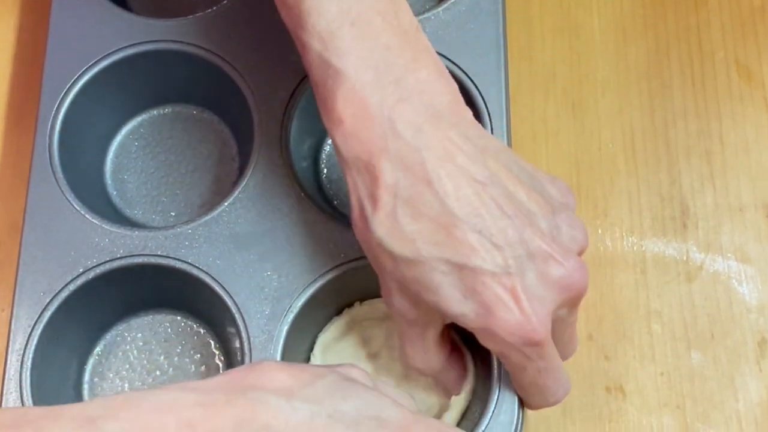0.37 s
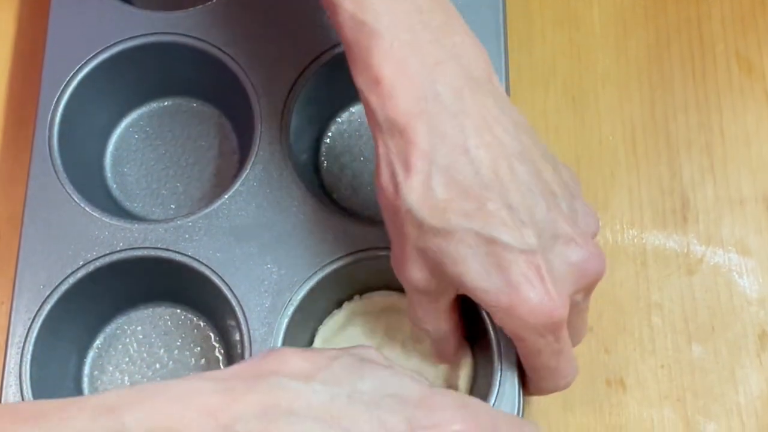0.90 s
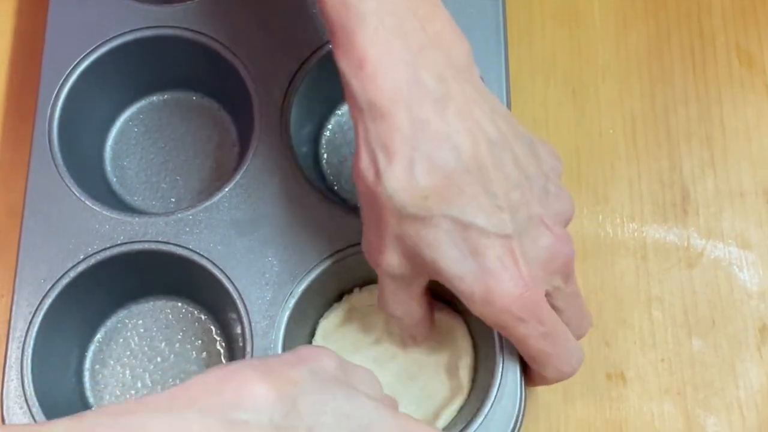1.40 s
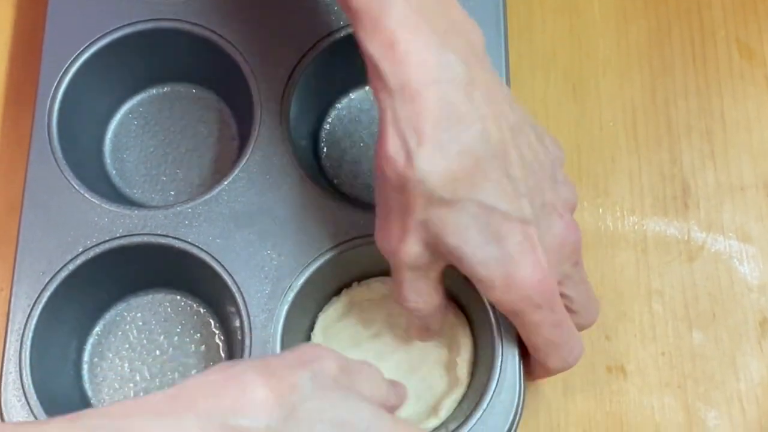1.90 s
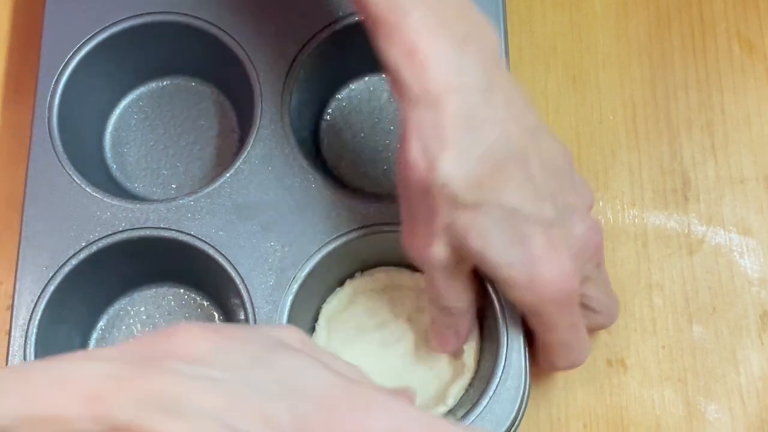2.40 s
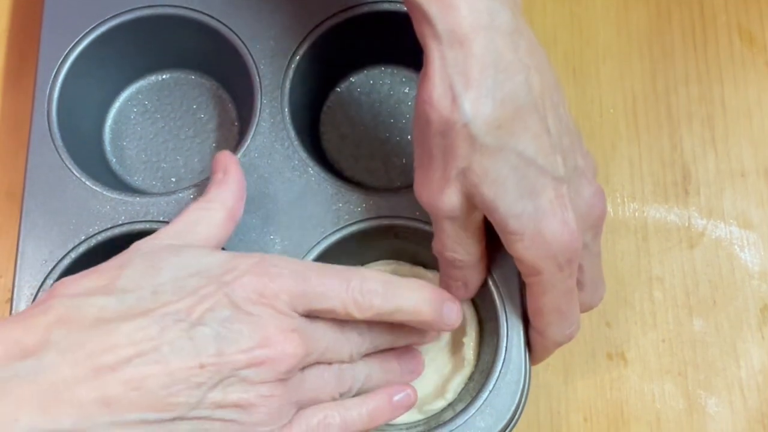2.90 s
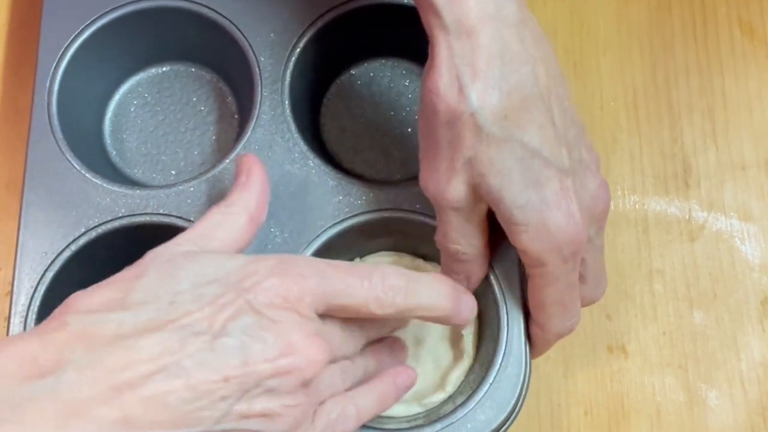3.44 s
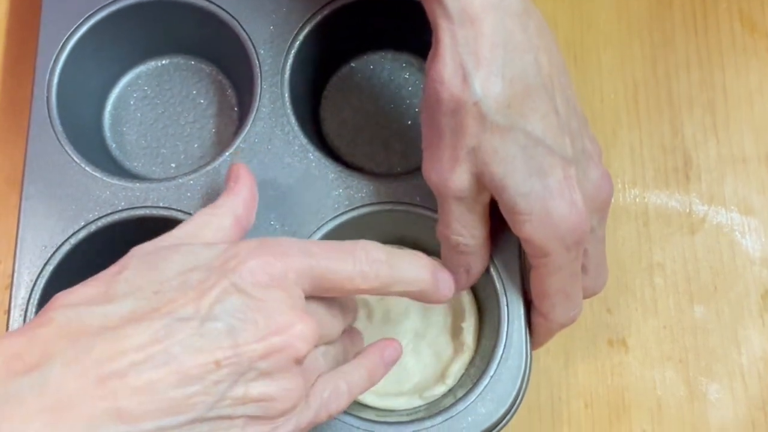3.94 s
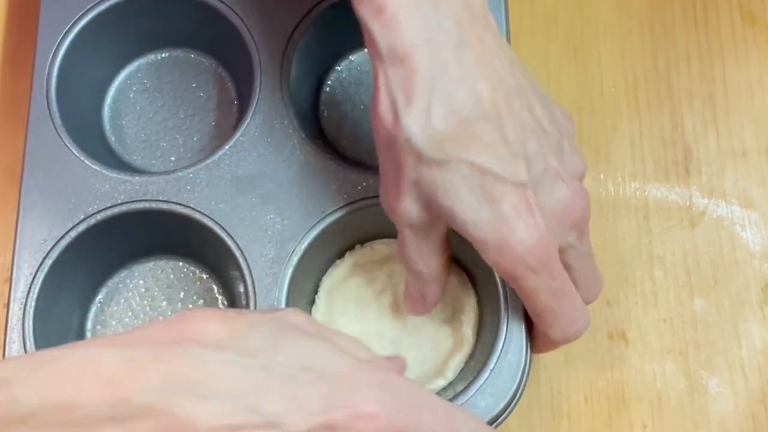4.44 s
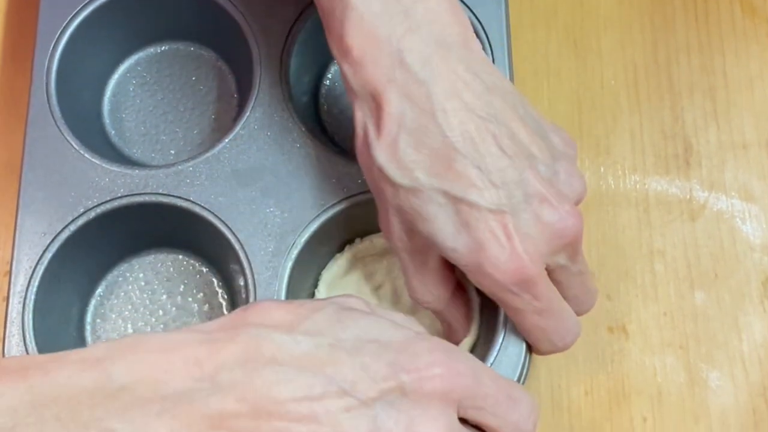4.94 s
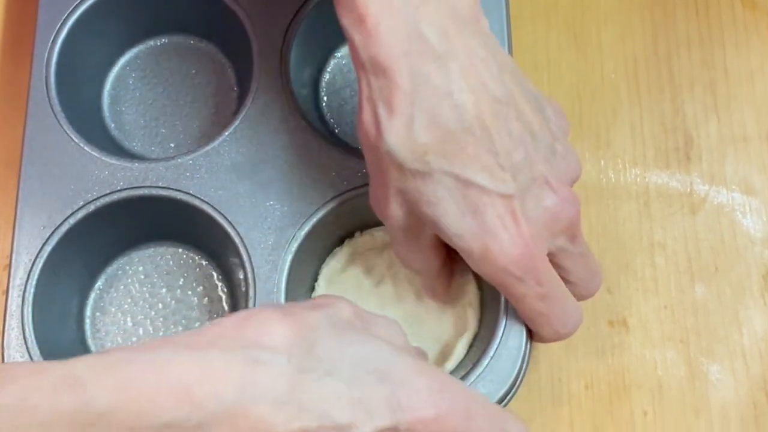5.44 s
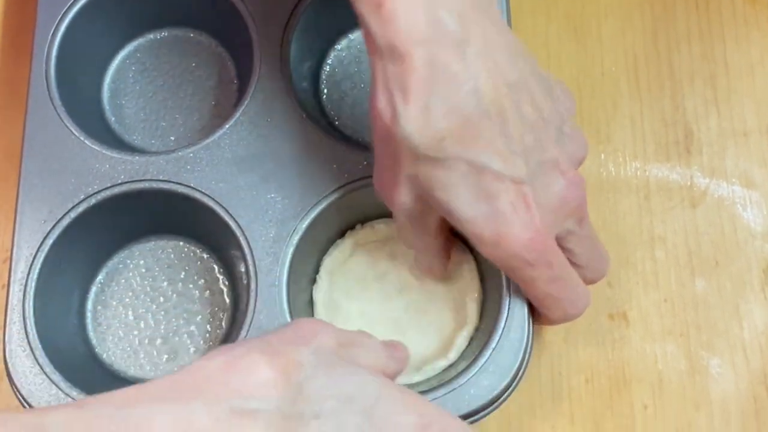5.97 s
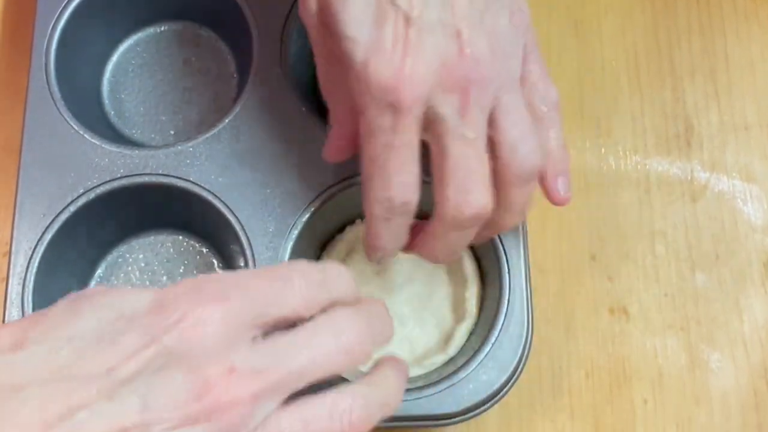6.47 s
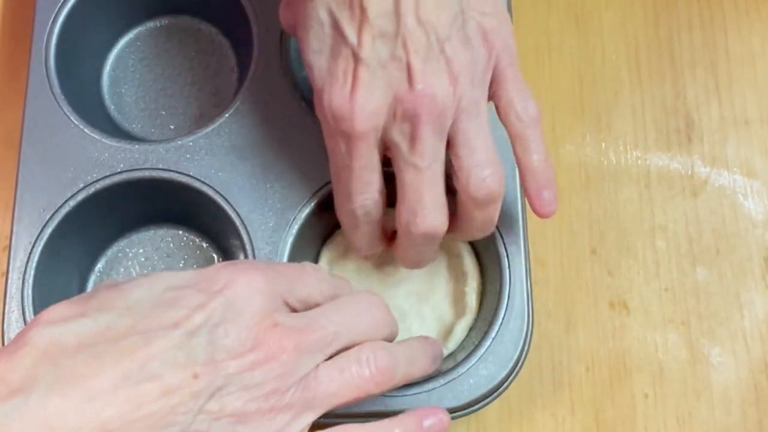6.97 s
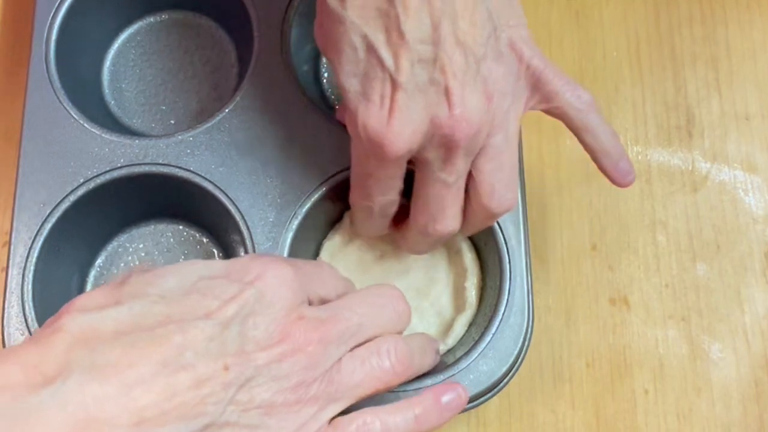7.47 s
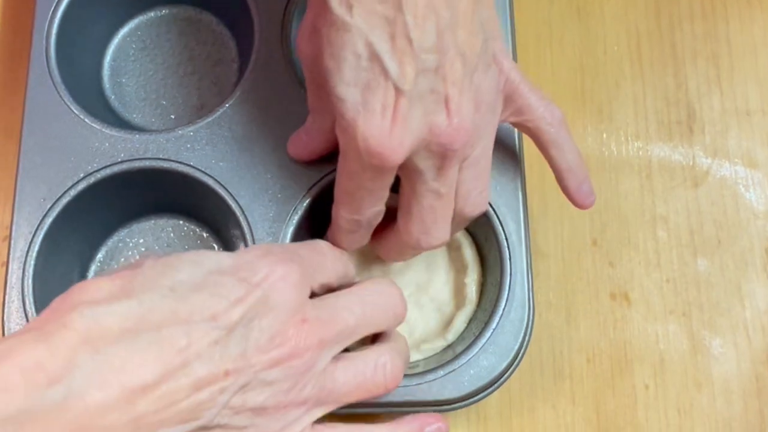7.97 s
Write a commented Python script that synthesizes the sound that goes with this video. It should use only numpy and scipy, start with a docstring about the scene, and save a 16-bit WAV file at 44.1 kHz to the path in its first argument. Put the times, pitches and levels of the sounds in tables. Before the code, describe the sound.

Fingers press and smear soft dough in a metal baking tin, with faint sticky rustles, low rumbles and knocks on a wooden counter.

```python
"""Fingers press soft dough into a cup of a metal baking tin on a wooden counter in a quiet kitchen.
Friction noise of skin on metal sets the tin ringing; smeared greasy dough gives crackling hiss, and ticks as it
lets go. The rocking tin knocks and slides, both as modal ringing, and uneven low noise through the counter's
modes makes a swelling rumble. Two close microphone ports on a stand hear this with reflections, air noise
and a faint whine."""
import sys
import numpy as np
from scipy import signal
from scipy.fft import rfft, irfft, next_fast_len
from scipy.io import wavfile

SR = 44100
rng = np.random.default_rng(int(sys.argv[2]) if len(sys.argv) > 2 else 0)


def waveform_to_disk(signal):
    """Save audio, clipped to [-1, 1], as 16-bit WAV at the path in sys.argv[1]."""
    frames = np.transpose(np.atleast_2d(signal))
    scaled = np.clip(frames, -1, 1) * 32767
    samples = np.round(scaled).astype(np.int16)
    wavfile.write(sys.argv[1], SR, samples)


def level_to_linear(level):
    """Convert decibel levels to linear amplitude factors, elementwise."""
    exponent = np.asarray(level, float) / 20
    return 10 ** exponent


N = 357819  # samples

# Air noise of the room. Each row: frequency in Hz, relative spectral level in dB.
ROOM_SPECTRUM = [(20, 9.5), (35, 7), (55, 2), (120, -2.5), (200, -26), (500, -12), (1400, -17),
                 (2600, -21.5), (5000, -28.5), (9000, -29.5), (14000, -34.5), (14600, -58.5)]
ROOM_DB, WHINE_HZ = -71, 2071.5

# Modes of the counter with the tin on it. Each row: frequency in Hz, level in dB,
# unshortened 60 dB decay time in s.
COUNTER_MODES = [(60.2, 4.5, 0.38), (97.44, -0.5, 0.39), (128.2, 3.5, 0.18), (153.4, -9, 0.23),
                 (213.4, -4, 0.11), (276, -6.5, 0.084), (342.7, -6, 0.06), (390.6, -3, 0.068)]

# Modes of the tin. Each row: frequency in Hz, level in dB, 60 dB decay time in s before the hands damp it.
TIN_MODES = [(398.8, 0.5, 0.084), (447, -4.5, 0.055), (547, -6, 0.17), (647, -3.5, 0.061), (817, -6, 0.15),
             (985, -2, 0.06), (1039, 6, 0.13), (1250, -2.5, 0.13), (1508, -8.5, 0.28), (1843, -6.5, 0.22),
             (2268, -0.5, 0.099), (2677, 2, 0.1), (3013, -7, 0.18), (3827, -5.5, 0.071), (4174, -6, 0.097),
             (4654, 3.5, 0.024), (6124, -12.5, 0.21), (6590, -8.5, 0.13)]

# The tin slides a little on the counter and sings. Each row: start in seconds, length in seconds, level in dB.
SLIDES = [(4.51, 0.1, -63), (4.62, 0.087, -75), (4.73, 0.21, -89), (5.3, 0.17, -79), (6.01, 0.048, -76.5)]

# The tin knocks on the counter. Each row: time in seconds, strength in dB, then depth (at 60 Hz),
# body (at 420 Hz) and hardness (at 1300 Hz), all three in dB relative to 130 Hz.
KNOCKS = [(1.835, -41, -14, -14, -33), (2.876, -35.5, -2.5, -17, -46), (3.011, -35, -14, 0, -41),
          (3.232, -45.5, -8, -10, -34), (3.318, -14.5, -10.5, -14, -39), (3.455, -32.5, -18, -2, -29),
          (3.467, -33.5, -8, 4.5, -33), (3.524, -27.5, -3, -3, -39), (3.585, -33, -2, -14.5, -43),
          (3.634, -43.5, -4, -11, -19), (3.711, -28, 2, -5, -47), (3.775, -34, -10, -18, -50),
          (3.907, -33, -7.5, -21, -44), (3.925, -41, -9.5, -7, -25.5), (3.949, -37.5, -14, -2.5, -29),
          (4.094, -38.5, -5, -5, -35), (4.497, -50, -19, 4, -14), (4.546, -44.5, -7, -2, -26),
          (5.061, -35, -9, -27, -54), (5.846, -36.5, -13.5, -6.5, -39), (5.995, -46, -13, -12, -22),
          (6.123, -44.5, -14, -5, -18), (6.207, -45.5, -13, 3, -17), (6.22, -41, -31, -1, -6),
          (6.242, -45, -26, -7, -27), (7.339, -38.5, -9, -22, -49), (7.452, -45, -1, -22, -47),
          (7.543, -21, -24, 2.5, -6.5)]

# Dough and nails let go or touch. Each row: start in seconds, peak level in dB, centre frequency in Hz.
TICKS = [(0.44, -52, 12000), (0.473, -60, 13000), (0.492, -64, 12000), (1.0343, -64, 12000),
         (1.058, -57, 12000), (1.1853, -63, 11000), (1.799, -61.5, 1510), (1.81, -57, 12000),
         (3.012, -53.5, 14800), (3.0373, -45, 13500), (3.0969, -70.5, 1510), (3.227, -61.5, 3210),
         (3.315, -57, 4910), (3.4427, -56, 10700), (3.707, -52, 4700), (3.829, -73, 4970),
         (3.978, -65, 6000), (4.13, -76, 5030), (4.6806, -56.5, 12000), (5.0645, -63.5, 13600),
         (6.222, -48.5, 5970), (7.068, -75.5, 900), (7.197, -61.5, 1400), (7.238, -63, 1300),
         (7.4545, -37.5, 4220), (7.54, -47, 4250), (7.959, -72.5, 4470), (7.992, -56.5, 12600)]

# Low rumble of the counter swells, between the knocks and as the tin rattles on after them.
# Each row: time of the crest in seconds, length in seconds, crest level in dB.
RUMBLE_SWELLS = [(0.01, 0.081, -51.5), (0.493, 0.15, -45), (0.93, 0.57, -64), (1.091, 0.29, -46.5),
                 (1.302, 0.21, -59.5), (1.827, 0.38, -55.5), (2.362, 0.3, -48), (3.039, 0.45, -46),
                 (3.447, 0.12, -45.5), (3.579, 0.17, -35.5), (3.784, 0.34, -41.5), (4.393, 0.075, -52),
                 (4.554, 0.21, -54.5), (4.986, 0.14, -51), (5.147, 0.44, -52), (5.719, 0.07, -51),
                 (5.848, 0.4, -46.5), (5.997, 0.056, -48), (6.131, 0.14, -43), (6.207, 0.33, -42.5),
                 (7.353, 0.1, -46.5), (7.453, 0.13, -51.5), (7.925, 0.15, -48.5)]
RUMBLE_FLOOR_DB = -68.5  # the rumble never quite stops

# Finger strokes. Each row: start in seconds, length in seconds, then the levels in dB of
# the dull drag, the bright drag and the smear.
STROKES = [(0.0, 0.024, -68, -70.5, -74), (0.265, 0.085, -68, -71, -73.5), (0.429, 0.12, -85, -74.5, -71),
           (0.527, 0.033, -79, -82, -69.5), (0.81, 0.059, -73.5, -107, -103),
           (0.872, 0.13, -70, -76.5, -79.5), (1.029, 0.049, -88, -73, -70),
           (1.073, 0.058, -91, -76.5, -75.5), (1.172, 0.11, -107, -79.5, -69.5),
           (1.543, 0.121, -68, -96, -85.5), (1.672, 0.038, -65, -96, -86),
           (1.791, 0.057, -74, -65.5, -69.5), (1.87, 0.079, -92, -85, -71.5),
           (2.173, 0.052, -63, -68, -72.5), (2.256, 0.12, -61, -87, -72), (2.317, 0.048, -60.5, -69, -67.5),
           (2.449, 0.044, -78, -99, -85), (2.997, 0.021, -57.5, -70, -68), (3.089, 0.015, -66, -64, -75.5),
           (3.213, 0.012, -82, -72, -69.5), (3.306, 0.035, -53.5, -90, -71), (3.435, 0.011, -56, -78, -66),
           (3.511, 0.03, -59.5, -93, -73.5), (3.615, 0.029, -66, -76, -73), (3.699, 0.024, -60.5, -65, -71),
           (3.812, 0.021, -77, -66.5, -72.5), (3.879, 0.03, -78, -89, -77), (3.914, 0.059, -63, -80, -90),
           (3.972, 0.022, -63, -70, -72), (4.112, 0.024, -61.5, -74, -74.5), (4.196, 0.07, -100, -91, -80),
           (4.291, 0.041, -84, -84, -79), (4.45, 0.12, -90, -76, -76), (4.486, 0.16, -66, -78, -76.5),
           (4.646, 0.064, -66, -69, -80.5), (4.73, 0.18, -75.5, -90, -85),
           (4.896, 0.065, -77.5, -85.5, -82.5), (5.054, 0.15, -90, -74.5, -71),
           (5.178, 0.1, -71, -72.5, -72.5), (5.293, 0.13, -75, -85, -77.5), (5.684, 0.079, -90, -69, -76),
           (5.784, 0.11, -70.5, -79, -73), (5.967, 0.31, -78.5, -78, -76.5),
           (6.091, 0.073, -61.5, -76, -71), (6.185, 0.062, -54.5, -67, -65),
           (6.266, 0.048, -89, -78, -71.5), (7.07, 0.03, -70, -103, -99), (7.191, 0.031, -82, -60.5, -90),
           (7.231, 0.014, -61, -73.5, -93), (7.265, 0.048, -63.5, -77, -76),
           (7.447, 0.017, -67, -55.5, -68.5), (7.473, 0.16, -84, -64, -75), (7.548, 0.017, -42, -51, -64.5),
           (7.548, 0.075, -54.5, -85, -82.5), (7.88, 0.054, -80.5, -78.5, -73),
           (7.951, 0.052, -75, -101, -73.5)]
SAG_DB = -9  # grip lost from the start of a contact to its end
RING_DB = -3.5  # ringing of the tin under a stroke, over its bright drag
FIRM_SMEAR_DB = -74  # here both ranges of the smear are equal
AIR_PER_DB = 0.66  # extra dB of the upper range per dB of smear, so faint smears lose their top faster
CRACKLES_PER_S, CRACKLE_DB = 420, -4.5  # tiny snaps of dough, level over the smear's hiss

# The two ports. Each row: frequency in Hz, share (0 to 1) that both hear, lead of the right in radians.
PORTS = [(60, .98, .0), (200, .93, .2), (500, .5, .8), (1200, .4, 1.6), (2500, .5, 3.1), (4200, .8, 6.3)]
PORT_LAG_S = 5.0 / SR  # above the table the right lags steadily


def rms_one(x):
    """Normalisation: scale to unit rms."""
    return x / np.sqrt(np.mean(x ** 2) + 1e-20)


def at_hz(points, hz, axis=1):
    """Interpolation: a table column is read on a logarithmic frequency axis."""
    return np.interp(np.log(hz + 1e-3), np.log(np.array(points)[:, 0]), np.array(points)[:, axis])


def coloured(x, spectrum):
    """Spectral shaping: white sound takes on a spectrum, at unit rms."""
    size = next_fast_len(N)
    hz = np.fft.rfftfreq(size, 1 / SR)
    return rms_one(irfft(rfft(x, size) * level_to_linear(at_hz(spectrum, hz)), size)[:, :N])


def band(x, low_hz, high_hz):
    """Band limitation: a Butterworth filter passes one range."""
    sos = signal.butter(2, [low_hz, min(high_hz, .45 * SR)], "band", fs=SR, output="sos")
    return signal.sosfilt(sos, x)


def ring(force, hz, t60):
    """Damped resonance: a unit click sets a decaying sine of height 1 ringing."""
    r = level_to_linear(-60 / (t60 * SR))
    w = 2 * np.pi * hz / SR
    return signal.lfilter([0, np.sin(w)], [1, -2 * r * np.cos(w), r * r], force + 1e-18)


def gritty(grit_db, grip_hz):
    """Stick-slip friction: two unrelated noises share one uneven grip, varying up to about grip_hz."""
    lowpass = signal.butter(2, grip_hz, fs=SR, output="sos")
    grip = signal.sosfilt(lowpass, rng.standard_normal(N))
    return rng.standard_normal((2, N)) * level_to_linear(grit_db * rms_one(grip))


def grips(rows, rise_s=0.0042, rise_share=0.21, fade_s=0.011):
    """Contact envelope: each grips fast, sags and fades; powers add, one gain for each level column."""
    power = np.zeros((len(rows[0]) - 2, N))
    for s, length_s, *levels_db in rows:
        i = round(s * SR)
        t = np.arange(min(round((length_s + .15) * SR), N - i)) / SR
        along = np.clip(t / length_s, 0, 1)
        rise = 1 - np.exp(-t / (rise_s + rise_share * length_s))
        sag = level_to_linear(SAG_DB * (along - .5))
        fade = np.exp(-np.maximum(t - length_s, 0) / fade_s)
        power[:, i:i + len(t)] += (level_to_linear(levels_db)[:, None] * rise * sag * fade) ** 2
    return np.sqrt(power)


def in_tin(force, low_hz, high_hz, held):
    """Forced modal response: a force drives the tin's modes in a range; unit white force gives about rms 1."""
    modes = [m for m in TIN_MODES if low_hz < m[0] < high_hz]
    power = sum(level_to_linear(2 * db) * held * t60 * SR / (4 * np.log(1000)) for hz, db, t60 in modes)
    return sum(level_to_linear(db) * ring(force, hz, held * t60) for hz, db, t60 in modes) / np.sqrt(power)


def room_tone():
    """Stationary background: air noise and a far appliance's whine, a thin line inside a fluttering hiss."""
    t = np.arange(N) / SR
    air = coloured(rng.standard_normal((2, N)), ROOM_SPECTRUM)
    hiss = rms_one(band(gritty(grit_db=3.5, grip_hz=75.0), 1875, 2140))
    line = np.sin(2 * np.pi * (WHINE_HZ * t + rng.random((2, 1))))
    return level_to_linear(ROOM_DB) * air + level_to_linear(-84.0) * hiss + level_to_linear(-75.0) * line


def kitchen(x, t60=0.31, wet_db=-14.5):
    """Reverberation: the room answers with exponentially dying noise, duller than the source."""
    t = np.arange(SR // 2) / SR
    noise = band(rng.standard_normal((2, len(t))), 220, 4400)
    tail = noise * level_to_linear(-60 * t / t60) * (t > .006)
    tail /= np.sqrt(np.sum(tail ** 2) / 2)
    return level_to_linear(wet_db) * signal.fftconvolve(x, tail, axes=1)[:, :N]


def rumble_level():
    """Power summation: smooth swells lie on a steady floor; returns the level in dB."""
    t = np.arange(N) / SR
    power = np.full(N, level_to_linear(2 * RUMBLE_FLOOR_DB))
    for s, length_s, crest_db in RUMBLE_SWELLS:
        near = slice(max(round((s - length_s / 2) * SR), 0), round((s + length_s / 2) * SR))
        power[near] += level_to_linear(2 * crest_db) * np.abs(np.cos(np.pi * (t[near] - s) / length_s)) ** 7.3
    return 10 * np.log10(power)


def rumble(level_db):
    """Forced vibration: uneven low noise shakes the modes of the counter."""
    force = band(gritty(grit_db=3.0, grip_hz=30.0), 65.6, 261.0)
    shaking = sum(level_to_linear(db) * ring(force, hz, 0.41 * t60) for hz, db, t60 in COUNTER_MODES)
    return level_to_linear(level_db) * rms_one(shaking)


def slides():
    """Stick-slip excitation: chatter at the feet of the tin drives its modes between 720 and 3300 Hz most."""
    chatter = rms_one(band(gritty(grit_db=3.5, grip_hz=59.0), 720, 3300))
    return in_tin(grips(SLIDES)[0] * chatter, 600, 4300, held=0.48)


def struck(modes, held, spread_db=3.5, travel=0.2186, rise_cycles=1.3):
    """Impact and dispersion: knocks strike every mode; bending waves bring low modes later and softer in onset."""
    s, strength_db, depth_db, body_db, hard_db = np.transpose(KNOCKS)
    out = np.zeros((2, N))
    luck = rng.normal(0, 1, (len(s), len(modes), 2))
    for k, (hz, mode_db, t60) in enumerate(modes):
        colour_db = [at_hz([(60, depth), (130, 0.0021), (420, body), (1300, hard), (4000, hard - 14.0)], hz)
                     for depth, body, hard in zip(depth_db, body_db, hard_db)]
        arrival_s = s + travel * (hz ** -.5 - 700 ** -.5)
        at = np.minimum((arrival_s * SR).astype(int), N - 1)
        level_db = strength_db + colour_db + mode_db - 6.5 + spread_db * luck[:, k].T
        clicks = np.zeros((2, N))
        clicks[:, at] = level_to_linear(level_db) * (-1) ** k  # neighbouring modes start in opposite phase
        soft = np.exp(-hz / (0.43 * rise_cycles * SR))
        out += signal.lfilter([1 - soft], [1, -soft], ring(clicks, hz, held * t60)) * 3
    return out


def knocks():
    """Damping: the counter booms, while the tin, held down by the hands, rings only briefly."""
    return struck(COUNTER_MODES, held=0.94) + struck(TIN_MODES, held=0.22)


def ticks(decay_s=0.0031, width=1.5):
    """Transient release: each tick is a short dying puff of noise about its centre frequency."""
    out = np.zeros((2, N + 2000))
    t = np.arange(2000) / SR
    for s, peak_db, hz in TICKS:
        noise = rng.standard_normal((2, 2000))
        puff = band(noise * np.exp(-t / decay_s), hz / width, hz * width)
        i = round(s * SR)
        out[:, i:i + 2000] += level_to_linear(peak_db) * puff / np.abs(puff).max()
    return out[:, :N]


def strokes():
    """Contact envelopes: gains of the four ranges of every stroke and of the ringing under it."""
    rows = []
    for *row, smear_db in STROKES:
        upper_db = smear_db + AIR_PER_DB * (smear_db - FIRM_SMEAR_DB)
        rows.append((*row, smear_db, upper_db))
    dull, bright, lower, upper = grips(rows)
    return dull, bright, lower, upper, level_to_linear(RING_DB) * bright


def drag(dull, bright, ringing):
    """Sliding friction: skin on metal makes dull and bright noise, and the tin rings under it."""
    friction = rms_one(gritty(grit_db=2.5, grip_hz=70.))
    dull_noise = rms_one(band(friction, 240, 1070))
    bright_noise = rms_one(band(band(friction, 660, 2000), 690, 3000))
    return dull * dull_noise + bright * bright_noise + in_tin(ringing * friction, 900, 3500, held=0.66)


def crackle(spread_db=3.0):
    """Random impulses: sparse snaps of uneven size, at unit rms."""
    snaps = rng.random(N) < CRACKLES_PER_S / SR
    sizes = level_to_linear(spread_db * np.minimum(rng.exponential(1, N), 4)) * snaps
    return rms_one(signal.lfilter([1], [1, -.93], sizes) * rng.standard_normal((2, N)))


def smear(lower, upper):
    """Adhesive friction: greasy dough hisses in two ranges, the lower driving the tin's top modes."""
    hiss = rms_one(rms_one(gritty(grit_db=1.5, grip_hz=55.0)) + level_to_linear(CRACKLE_DB) * crackle())
    sung = level_to_linear(-4.0) * in_tin(lower * hiss, 3500, 9000, held=0.44)
    return sung + lower * rms_one(band(hiss, 3800, 8710)) + upper * rms_one(band(hiss, 6350, 17700))


def scene():
    """Superposition: all sources add, along two paths from which the ports are then formed."""
    dull, bright, lower, upper, ringing = strokes()
    tick = ticks()
    tick_in_tin = level_to_linear(-1.0) * in_tin(tick, 2000, 7000, held=0.15)
    fingers = drag(dull, bright, ringing) + smear(lower, upper)
    near = slides() + knocks() + tick + tick_in_tin + fingers
    return room_tone() + kitchen(near) + rumble(rumble_level()) + near


def low_pass(x):
    """Removes everything above the highest recorded frequency."""
    return signal.sosfilt(signal.butter(12, 15710, fs=SR, output="sos"), x)


def record(dry):
    """Partial coherence: the right port shares part of the left's sound, turned in phase; deep bass is cut."""
    size = next_fast_len(N)
    hz = np.fft.rfftfreq(size, 1 / SR)
    above = np.maximum(hz - PORTS[-1][0], 0)
    shared = np.clip(at_hz(PORTS, hz) + above / 25000.0, 0, .99)
    lead = at_hz(PORTS, hz, axis=2) - 2 * np.pi * above * PORT_LAG_S
    left, other = rfft(dry, size)
    right = (shared * left + np.sqrt(1 - shared ** 2) * other) * np.exp(1j * lead)
    # Each row: frequency in Hz, gain of left over right in dB; half goes to each port.
    balance = level_to_linear(at_hz([(150, -0.7), (1500, 3.0), (4000, 0.8)], hz) / 2)
    spectra = np.array([left * balance, right / balance]) * (hz < 15750)
    ports = irfft(spectra, size)[:, :N]
    ports = signal.sosfilt(signal.butter(3, 45., "high", fs=SR, output="sos"), ports)
    return low_pass(ports)


dry = scene()
out = record(dry)
waveform_to_disk(out)
```